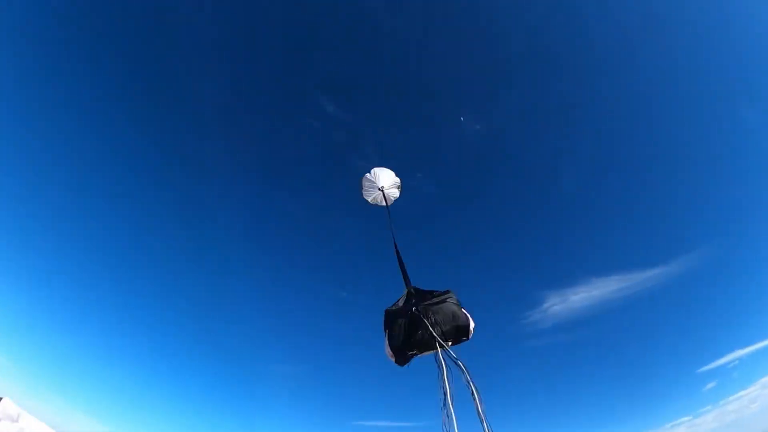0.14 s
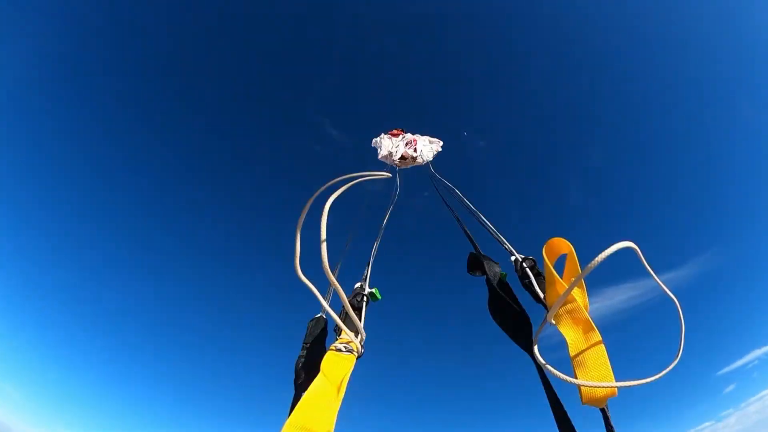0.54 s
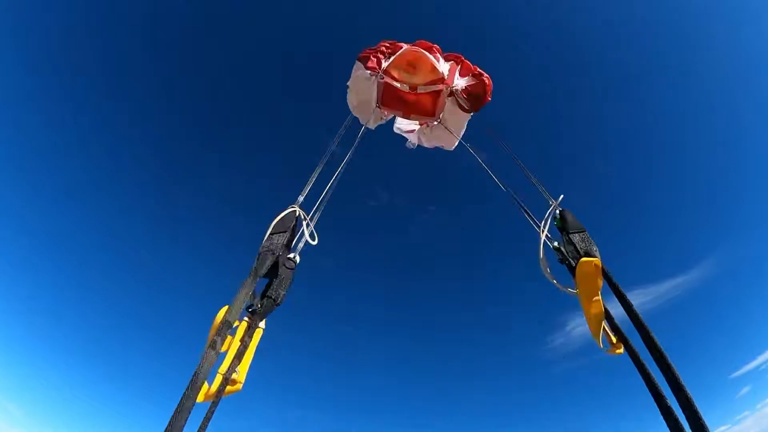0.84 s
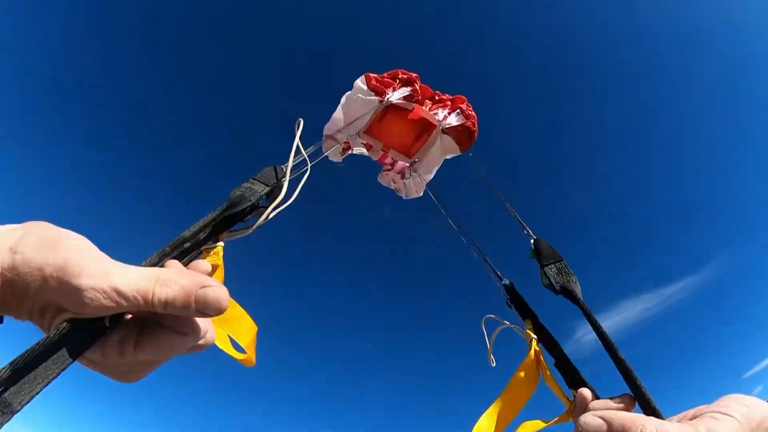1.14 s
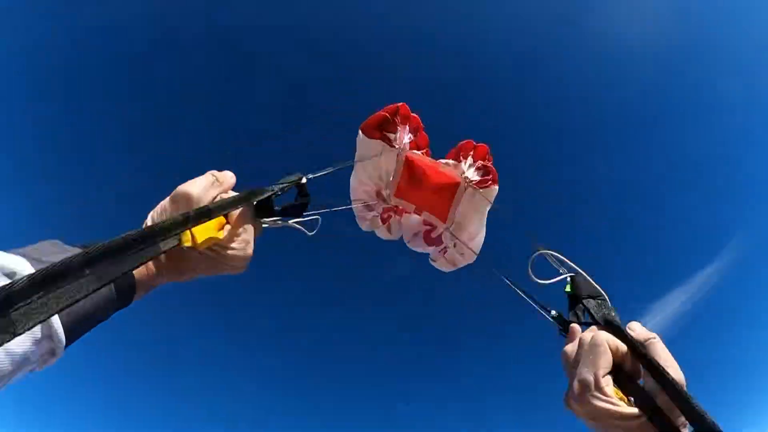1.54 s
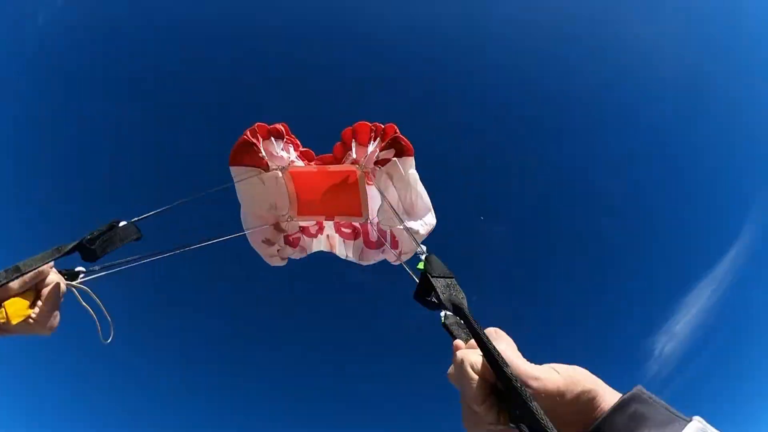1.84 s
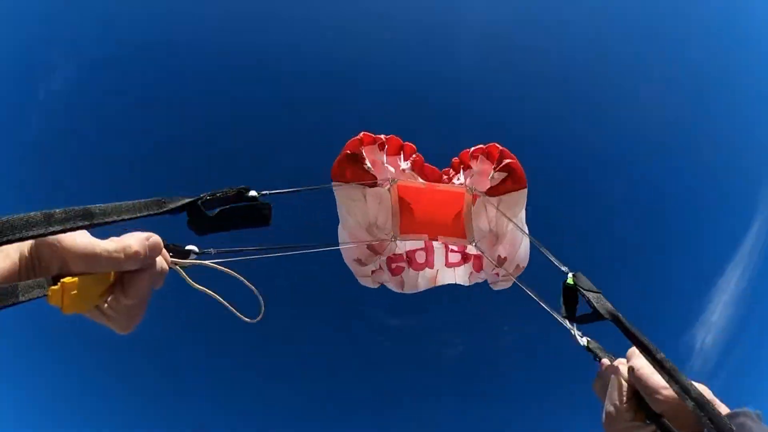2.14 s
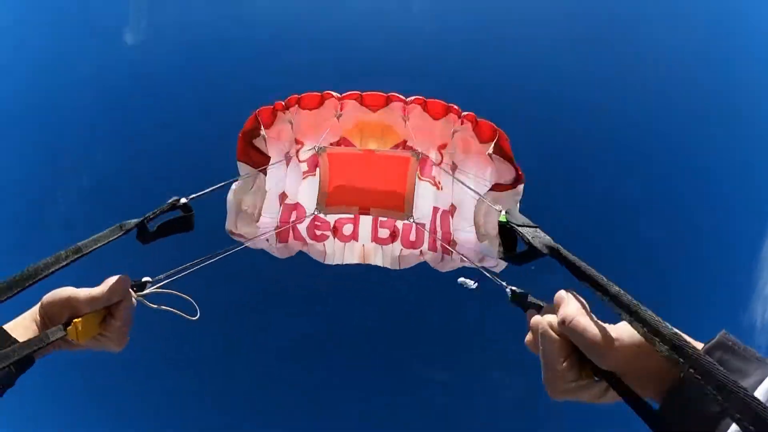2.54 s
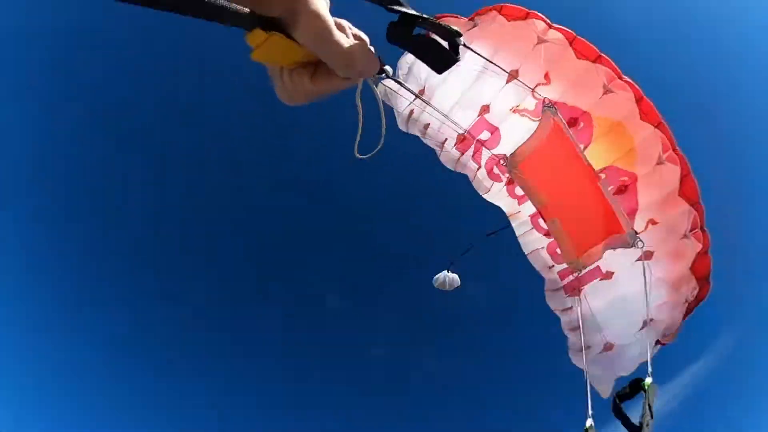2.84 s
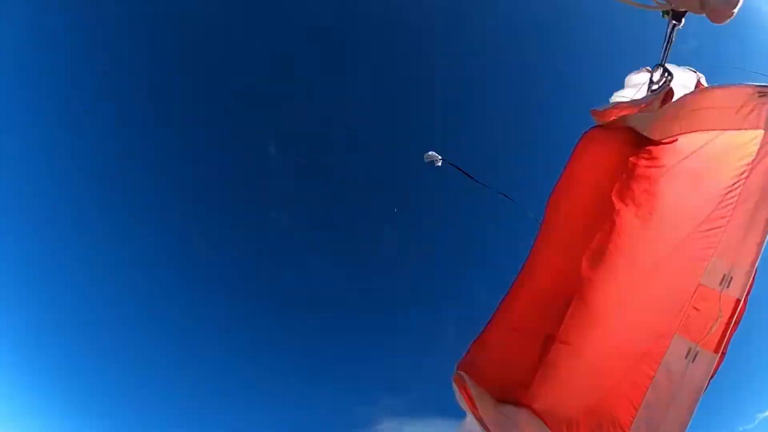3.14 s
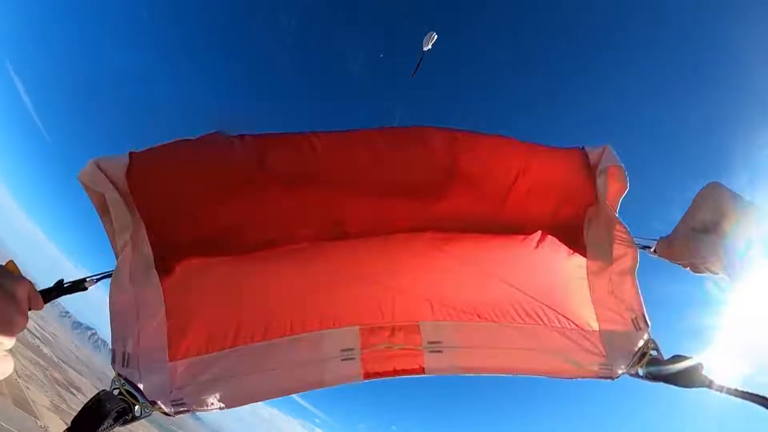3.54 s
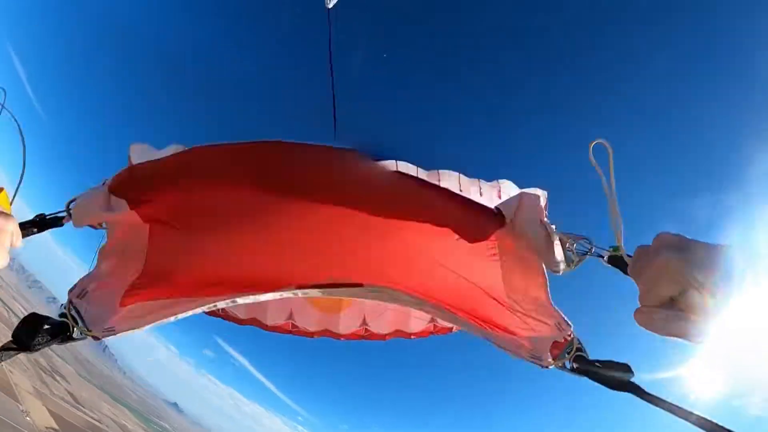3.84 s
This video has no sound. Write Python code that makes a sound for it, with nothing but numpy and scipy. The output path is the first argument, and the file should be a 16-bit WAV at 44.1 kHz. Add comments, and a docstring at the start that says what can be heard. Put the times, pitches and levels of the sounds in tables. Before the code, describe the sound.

Skydiver's parachute opening: freefall wind roar, a buffeting surge, sudden quiet, then flapping fabric.

```python
"""High in the open sky, a skydiver's parachute opens, heard from a microphone on the body.
Freefall air rushes past, drops to a rumble, then buffets the microphone in a surge as the canopy fills.
The roar collapses once the canopy is open, and loose fabric overhead starts to flutter, flap and crack.
The air is noise shaped by curves of tone and level; gusts and canopy beats roughen it.
The fabric is crackling noise, short thuds, pushes of air and brief booming tones."""
import sys
import numpy as np
from scipy import signal
from scipy.fft import rfft, irfft
from scipy.io import wavfile
from scipy.ndimage import uniform_filter1d

SR = 44100
rng = np.random.default_rng(int(sys.argv[2]) if len(sys.argv) > 2 else 0)


def transcribe(signal):
    """Save signal, clipped to [-1, 1], as a 16-bit WAV file at the path in sys.argv[1]."""
    frames = np.atleast_2d(signal).T
    limited = np.clip(frames, -1, 1)
    pcm = np.round(limited * 32767).astype(np.int16)
    wavfile.write(sys.argv[1], SR, pcm)


N = 176400
T = np.arange(N) / SR  # time_s of every sample

# Every TONE table is the tone of one layer: pitch_hz, level_db (only relative levels matter)
# low pressure swings of the airflow: time_s, level_db
RUMBLE_LEVEL = [(0, -18.5), (.53, -16.5), (.585, -22), (.625, -16.5), (1.08, -18), (1.16, -10.5),
                (1.25, -20), (1.55, -16.5), (2.0, -19.5), (2.4, -19.5), (2.54, -21.5), (2.67, -21.5),
                (2.74, -36.5), (2.82, -30), (2.95, -34.5), (3.18, -31.5), (3.27, -24), (3.56, -25),
                (4, -23)]
# tone of the rumble: pitch_hz, level_db
RUMBLE_TONE = [(8, -18.5), (22, -7), (42, -2.5), (65, -0.5), (95, -2.5), (135, -15), (300, -37), (900, -83)]
# eddies striking the microphone: time_s, body_level_db, buffet_level_db, roar_level_db
EDDY_LEVELS = [(0, -20.5, -21, -27), (.36, -18, -24, -32.5), (.46, -23, -27, -39), (.8, -20, -32.5, -37.5),
               (1.095, -22, -30, -40.5), (1.125, -17.5, -14.5, -18), (1.17, -16, -17, -20),
               (1.22, -18.5, -23, -27.5), (1.29, -18.5, -14, -23.5), (1.66, -18, -18, -23),
               (1.73, -20, -19, -27.5), (1.89, -18, -23, -27), (1.98, -19, -16, -29), (2.2, -17, -20, -31),
               (2.4, -20, -23.5, -35), (2.49, -15.5, -22, -37), (2.56, -21, -29, -38),
               (2.655, -21.5, -28, -44), (2.705, -47.5, -48, -54.5), (3.0, -51, -43.5, -54),
               (3.15, -47, -38, -43.5), (3.28, -30.5, -39.5, -34.5), (3.53, -43, -38, -35),
               (3.77, -25, -33, -30.5), (3.815, -38, -40, -34), (3.88, -25, -31.5, -32.5),
               (4, -37.5, -44, -33.5)]
# tones of the low body, the low-mid buffeting and the midrange roar: pitch_hz, level_db
BODY_TONE = [(45, -26.5), (80, -10.5), (115, 1.5), (160, -4), (220, -11.5), (400, -37), (1200, -89.5)]
BUFFET_TONE = [(90, -31.5), (150, -6), (195, 0.5), (260, -4.5), (340, -6.5), (430, -12.5), (650, -31),
               (2500, -73.5)]
ROAR_TONE = [(150, -17.5), (300, -8), (440, 1), (680, -3.5), (1000, -10.5), (1500, -19), (3000, -40.5),
             (5500, -55.5), (10000, -92.5)]
# smooth hiss of the fast air in freefall: time_s, level_db
RUSH_LEVEL = [(0, -33), (.12, -34.5), (.21, -36), (.33, -36), (.4, -40), (.425, -48), (.53, -91)]
RUSH_TONE = [(400, -25.5), (1000, 7.5), (1800, 1), (3300, -3.5), (4600, -10), (6000, -15), (7500, -24.5),
             (9500, -33), (11500, -39.5), (13600, -53.5)]
# faint hiss of air under everything, from the freefall to the end: time_s, level_db
AIR_LEVEL = [(0, -58), (.5, -54.5), (1.08, -59), (2.25, -63), (2.55, -71), (2.75, -71), (3.0, -64.5),
             (4, -54)]
AIR_TONE = [(500, -2), (1200, -5.5), (2800, -7), (4400, -12.5), (5800, -11.5), (7300, -18.5), (8600, -30),
            (12000, -44)]
# ragged treble of the eddies while the canopy fills: time_s, level_db
TEARING_LEVEL = [(1.09, -52), (1.115, -36.5), (1.155, -32), (1.2, -40.5), (1.235, -47), (1.255, -32.5),
                 (1.29, -39), (1.33, -35.5), (1.4, -43), (1.58, -40.5), (1.72, -45.5), (1.83, -42.5),
                 (2.02, -46), (2.14, -44), (2.27, -48.5), (2.45, -48), (2.52, -54.5), (2.6, -50.5),
                 (2.64, -55), (2.73, -64)]
TEARING_TONE = [(500, -15.5), (1300, 3.5), (2200, -1.5), (3500, -7), (5000, -14), (7000, -25.5),
                (10000, -37.5), (13500, -61.5)]
# depth of the quick flogging of the half-filled canopy: time_s, swing_db
FLOGGING_DEPTH = [(1.15, 0), (1.4, 2.3), (1.8, 2.7), (2.15, 1.1)]
# flaps, first inside the roar, then alone: peak_s, crackle_db, thud_db, push_db, fade_s
FLAP_EVENTS = [(1.189, -36, -30, -34, 0.0023), (1.252, -37.5, -37, -27, .007),
               (1.311, -34.5, -25, -30, 0.009), (1.376, -40, -27, -11.5, .002),
               (1.444, -34, -28, -6.5, 0.0025), (1.574, -32, -28, -32, 0.0036),
               (1.616, -43, -27, -28, 0.0018), (1.64, -36, -20, -29, .003),
               (1.837, -37.5, -25, -38, 0.0034), (2.531, -48, -26, -37, 0.0019),
               (2.639, -53, -37.5, -19.5, 0.0036), (2.748, -59, -47, -55, .0023),
               (2.941, -54, -45, -62.5, 0.0027), (3.027, -44.5, -37.5, -33, 0.014),
               (3.077, -46.5, -31.5, -25.5, 0.013), (3.142, -43, -32.5, -39, 0.0031),
               (3.218, -28.5, -26.5, -34, 0.0066), (3.248, -38.5, -28, -24, 0.013),
               (3.29, -36, -30, -37, 0.018), (3.359, -49, -21.5, -22, 0.0028),
               (3.428, -33, -35, -37, 0.024), (3.489, -31, -27, -23, 0.014),
               (3.587, -29.5, -31, -34, 0.00088), (3.602, -23, -18.5, -14.5, 0.0075),
               (3.725, -22, -13, -14, 0.007), (3.776, -36, -28, -27, .004),
               (3.834, -26.5, -29, -29, 0.0028), (3.869, -20, -16.5, -12, 0.0081),
               (3.925, -34, -31, -24, 0.0035), (3.932, -28, -16, -19.5, 0.007),
               (3.975, -30.5, -23.5, -39, 0.012)]
THUD_TONE = [(40, -14.5), (140, 1), (230, 4), (450, 0.5), (700, 2.5), (1200, -13.5), (2500, -26),
             (8000, -69.5)]
# rustle of the loose fabric: time_s, level_db
FLUTTER_LEVEL = [(2.98, -80), (3.1, -61), (3.18, -46), (3.29, -40), (3.33, -45.5), (3.39, -40),
                 (3.44, -33.5), (3.47, -42), (3.5, -38), (3.565, -45.5), (3.62, -42.5), (3.69, -38),
                 (3.78, -38.5), (3.815, -43.5), (3.86, -37.5), (4, -39.5)]
# tone of the fabric, in flutter and flaps alike: pitch_hz, level_db
FABRIC_TONE = [(90, -6), (180, 8), (270, -3), (450, -4), (700, -8), (1000, -1), (1400, 1.5), (2100, 1),
               (3400, -5.5), (4300, -7.5), (6200, -17.5), (8000, -29), (10500, -40.5), (13500, -55.5)]
# cloth pulled taut, booming like a slack drum: start_s, level_db (before rise and fade), pitch_hz
BOOM_EVENTS = [(3.392, -18, 250), (3.7262, -1, 175), (3.8665, -14, 350), (3.9275, -13, 205)]

GUST_HZ = 88.5  # how fast gusts wander
BUFFET_GUST_DB, ROAR_GUST_DB, TEAR_GUST_DB = -0.5, 1.55, 1  # gust swing; minus turns it over
FLOG_HZ, FLOG_JITTER = 52.04, 0.51  # beats a second, and their unevenness as a fraction
FLAP_RISE_S, PUSH_S, SNAP_S = 0.0044, 0.0092, 0.00012
SNAP_DB = 10.5  # snap compared with the flap's crackle
CLUMP_DB, CREASE_DB = 2.8, 4.3  # swings of slow clumps and of tiny creases
BOOM_RISE_S, BOOM_FADE_S = 0.00081, 0.0046
CEILING = 0.74  # level at which the microphone's peaks are rounded
EDGE_HZ = 13700  # top of the band


def amp(db):
    """Turns decibels into gain."""
    return 10 ** (np.asarray(db) / 20)


def unit(x):
    """Scales a signal to an average (rms) strength of 1."""
    return x / np.sqrt(np.mean(x ** 2) + 1e-20)


def level(points, axis=1):
    """Gain over time from one dB column of a table."""
    rows = np.array(points)
    return amp(np.interp(T, rows[:, 0], rows[:, axis]))


def colour(x, points):
    """Gives a signal a tone, nearly silent above the last point, without sounding ahead of time."""
    hz, db = np.transpose(points)
    bin_hz = abs(np.fft.fftfreq(N, 1 / SR))
    gain_db = np.interp(np.log(bin_hz + 1), np.log(hz), db, right=-120)
    log_gain = np.log(amp(gain_db))
    # the Hilbert transform finds the phase that keeps the filter causal
    response = np.exp(signal.hilbert(log_gain).conj())[:N // 2 + 1]
    return unit(irfft(rfft(x) * response, N))


def noise():
    """White noise: every pitch equally strong."""
    return rng.standard_normal(N)


def wander(rate_hz):
    """Random motion up to about a rate, without slow drift."""
    f = np.fft.rfftfreq(N, 1 / SR) / rate_hz
    shape = f / (f + 0.04) / np.sqrt(1 + f ** 4)
    return unit(irfft(rfft(noise()) * shape, N))


def steady(x, size):
    """Holds the power of a turbulent flow even over some samples."""
    power = uniform_filter1d(uniform_filter1d(x ** 2, size), size)
    return x / np.sqrt(abs(power) + 1e-9)


def rumble():
    """Low pressure swings of the airflow, as deep noise."""
    return steady(colour(noise(), RUMBLE_TONE), size=2400) * level(RUMBLE_LEVEL)


def eddies(gust, beats_db):
    """Eddies of three sizes strike the microphone: low body, buffeting and roar."""
    body = steady(colour(noise(), BODY_TONE), size=2400)
    gusty = noise() * amp(BUFFET_GUST_DB * gust)
    buffet = steady(colour(gusty, BUFFET_TONE), size=2400)
    rough = noise() * amp(ROAR_GUST_DB * gust + 0.55 * beats_db)
    roar = steady(colour(rough, ROAR_TONE), size=2000)
    low = body * level(EDDY_LEVELS) + buffet * level(EDDY_LEVELS, axis=2)
    return low + roar * level(EDDY_LEVELS, axis=3)


def rush(gust):
    """Fast freefall air hisses smoothly, lightly moved by the gusts."""
    return colour(noise() * amp(0.82 * gust), RUSH_TONE) * level(RUSH_LEVEL)


def air():
    """A faint, even hiss of air lies under everything."""
    return colour(noise(), AIR_TONE) * level(AIR_LEVEL)


def tearing(gust, beats_db):
    """Ragged treble of the eddies: gusts, beats, lumps and quick spits roughen the noise."""
    lumps = wander(20)
    spits = wander(700)
    torn = noise() * amp(TEAR_GUST_DB * gust + beats_db + 1.3 * lumps + 2.8 * spits)
    return steady(colour(torn, TEARING_TONE), size=3000) * level(TEARING_LEVEL)


def flogging():
    """Uneven, quick beats of the half-filled canopy, as a swing in dB."""
    beat_hz = FLOG_HZ * (1 + FLOG_JITTER * wander(40))
    turns = np.cumsum(beat_hz) / SR
    depth_db = np.interp(T, *np.transpose(FLOGGING_DEPTH))
    return depth_db * unit(np.cos(2 * np.pi * turns))


def pulse(t, width_s):
    """Pressure swings up, then down through zero at t = 0, with peaks of 1."""
    return -t / width_s * np.exp(0.5 - 0.5 * (t / width_s) ** 2)


def flaps():
    """Each flap pushes air, whips over with a snap, and dies in a thud and a crackle."""
    crackle = steady(colour(noise() * amp(5 * wander(1500)), FABRIC_TONE), size=300)
    thud = steady(colour(noise(), THUD_TONE), size=500)
    out = np.zeros(N)
    for peak_s, crackle_db, thud_db, push_db, fade_s in FLAP_EVENTS:
        near = abs(T - peak_s) < 0.1
        t = T[near] - peak_s
        shape = np.exp(np.minimum(t / FLAP_RISE_S, -t / fade_s))  # swells to its peak, then fades
        snap = amp(SNAP_DB) * pulse(t, SNAP_S)
        out[near] += amp(crackle_db) * (shape * crackle[near] + snap)
        out[near] += amp(thud_db) * shape * thud[near]
        out[near] += amp(push_db) * pulse(t, PUSH_S)
    return out


def flutter():
    """Clumps of tiny creases snap in the airstream, as unevenly strong noise."""
    swing_db = CLUMP_DB * wander(70) + CREASE_DB * wander(1500)
    creases = noise() * amp(swing_db)
    return steady(colour(creases, FABRIC_TONE), size=2000) * level(FLUTTER_LEVEL)


def booms():
    """Taut cloth swings briefly at its own pitch and quickly dies away."""
    out = np.zeros(N)
    for start_s, db, hz in BOOM_EVENTS:
        t = np.maximum(T - start_s, 0)
        shape = (1 - np.exp(-t / BOOM_RISE_S)) * np.exp(-t / BOOM_FADE_S)
        out += amp(db) * shape * np.sin(2 * np.pi * hz * t)
    return out


def scene():
    """Air and fabric at one microphone; the same gusts and beats roughen roar and treble together."""
    gust = wander(GUST_HZ)
    beats_db = flogging()
    wind = rumble() + eddies(gust, beats_db) + rush(gust) + air() + tearing(gust, beats_db)
    fabric = flaps() + flutter() + booms()
    return (wind + fabric)[None]


def record(dry):
    """Rounds off the largest peaks, softens both ends, then limits the band."""
    rounded = dry / (1 + (dry / CEILING) ** 6) ** (1 / 6)
    ends = np.minimum(np.minimum(T, T[-1] - T) / 0.002, 1)  # 2 ms ramps
    lowpass = signal.firwin(511, EDGE_HZ, window=("kaiser", 9), fs=SR)
    return signal.oaconvolve(rounded * ends, lowpass[None], "same")


dry = scene()
out = record(dry)
transcribe(out)
```